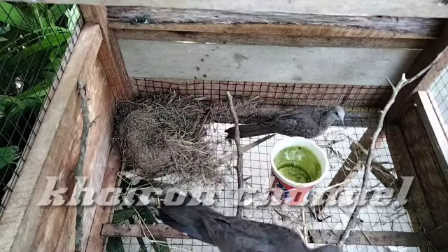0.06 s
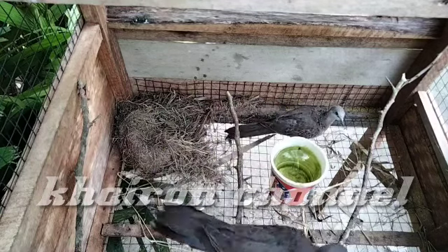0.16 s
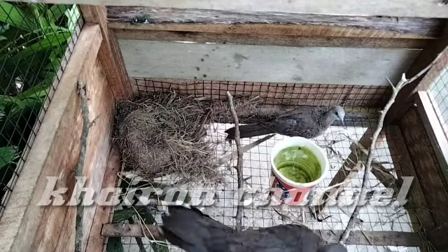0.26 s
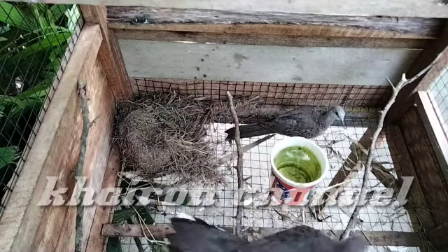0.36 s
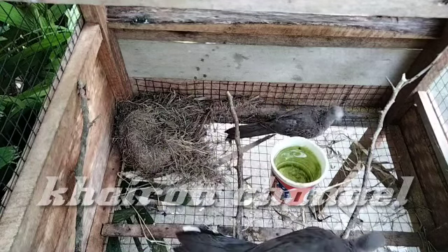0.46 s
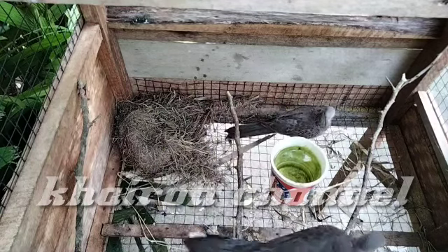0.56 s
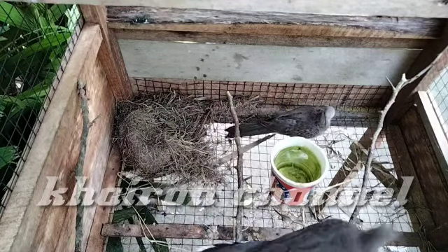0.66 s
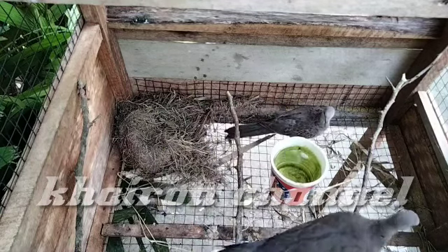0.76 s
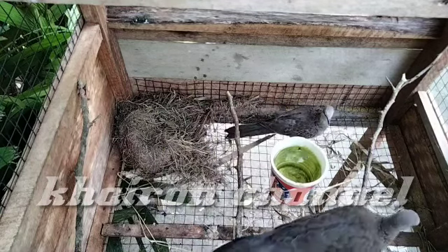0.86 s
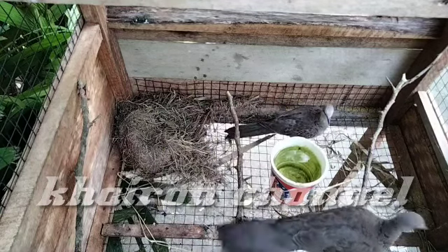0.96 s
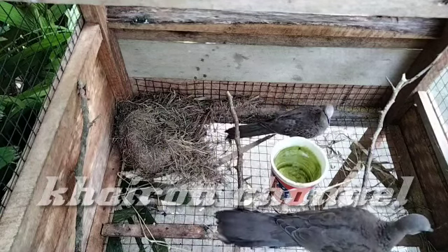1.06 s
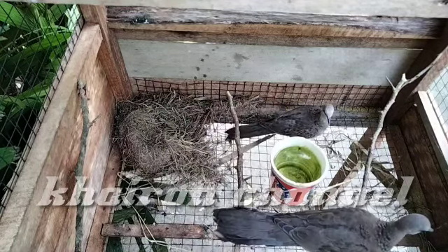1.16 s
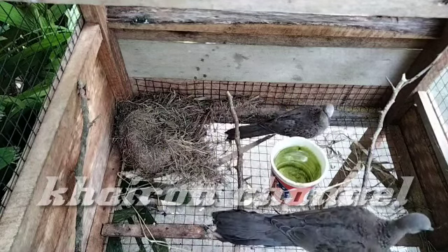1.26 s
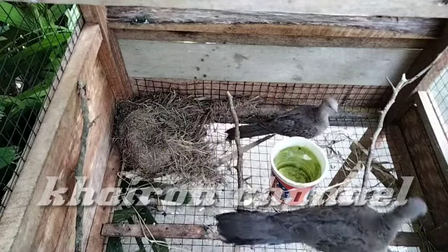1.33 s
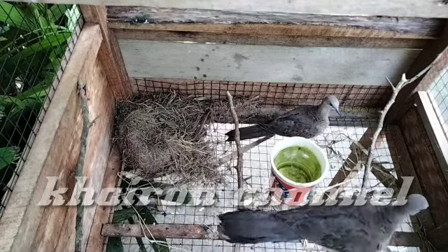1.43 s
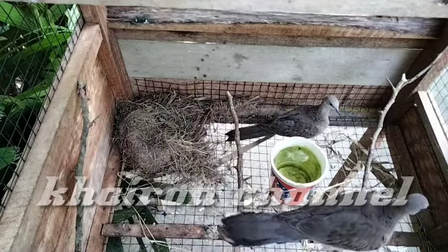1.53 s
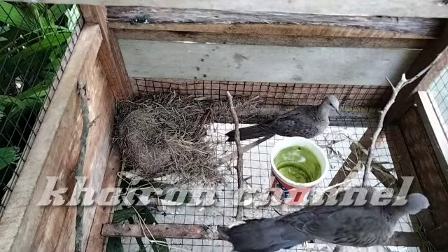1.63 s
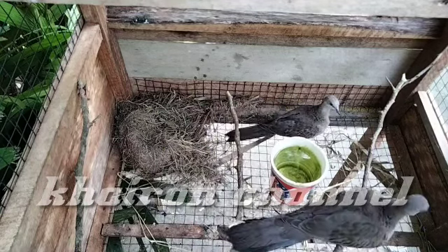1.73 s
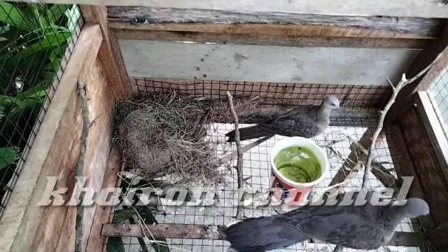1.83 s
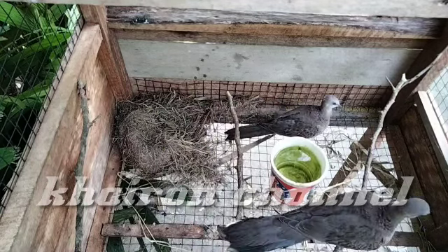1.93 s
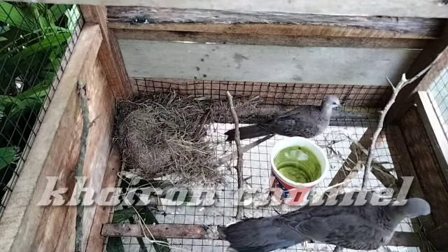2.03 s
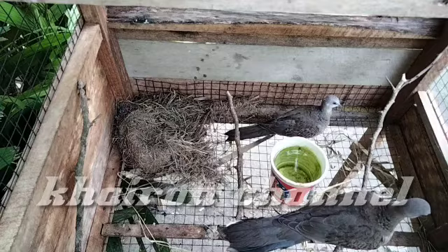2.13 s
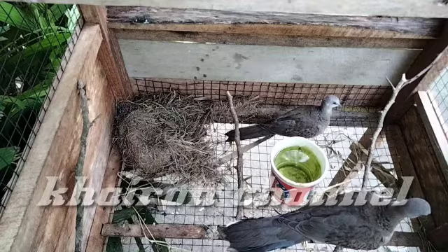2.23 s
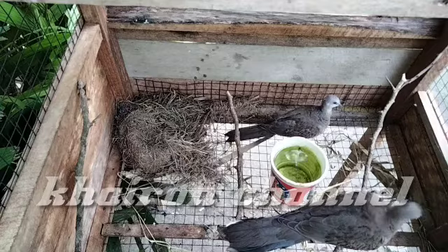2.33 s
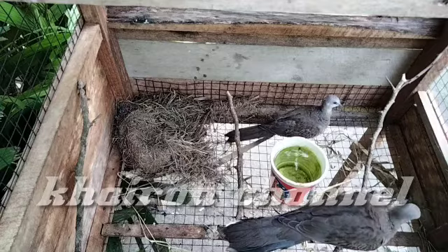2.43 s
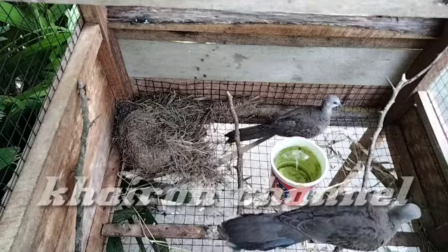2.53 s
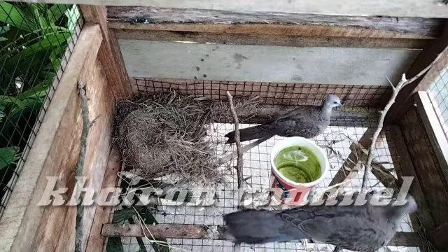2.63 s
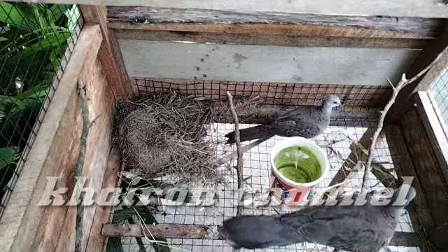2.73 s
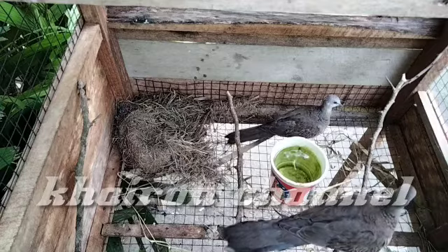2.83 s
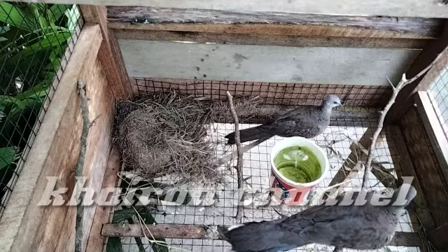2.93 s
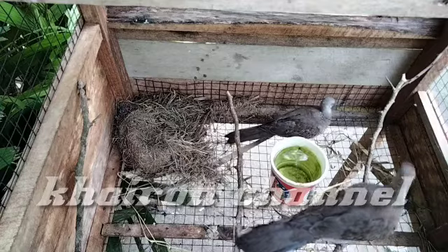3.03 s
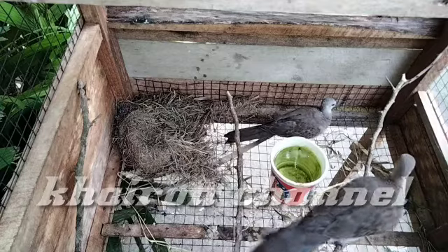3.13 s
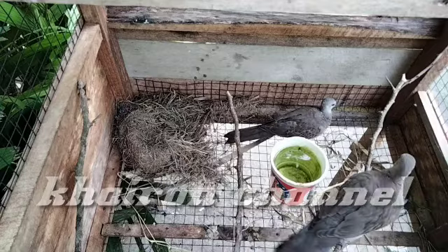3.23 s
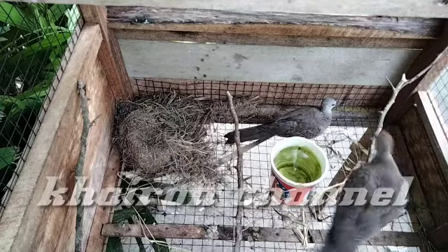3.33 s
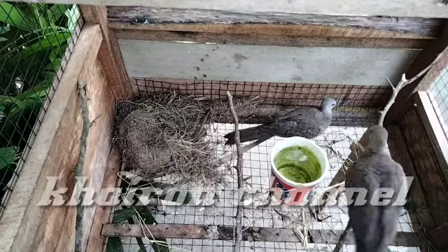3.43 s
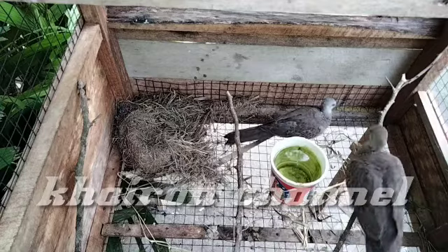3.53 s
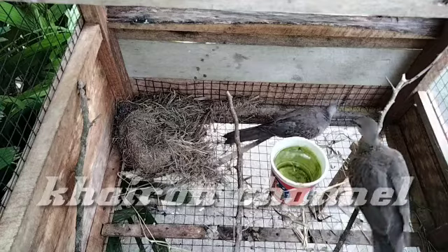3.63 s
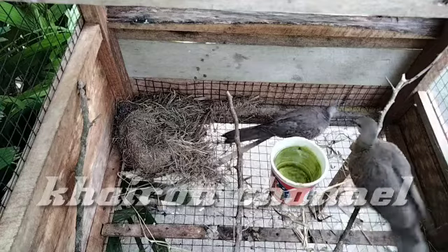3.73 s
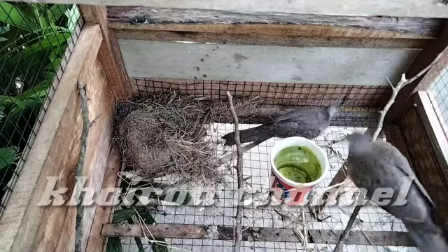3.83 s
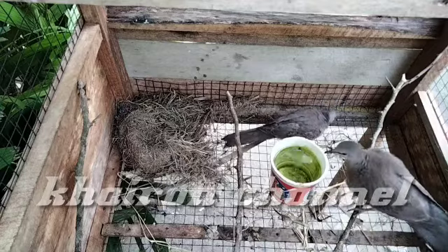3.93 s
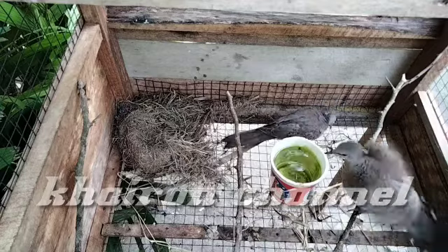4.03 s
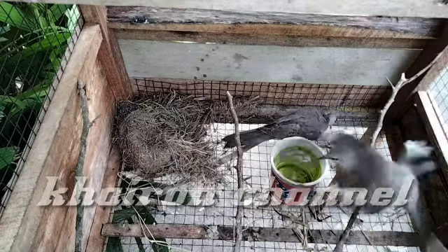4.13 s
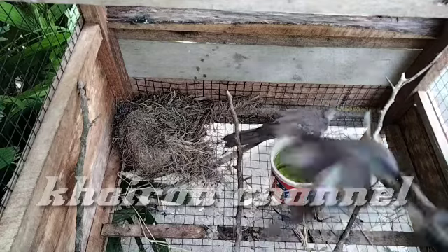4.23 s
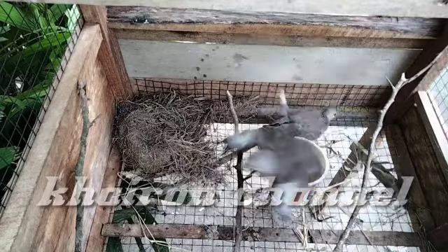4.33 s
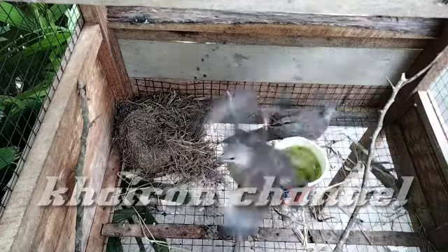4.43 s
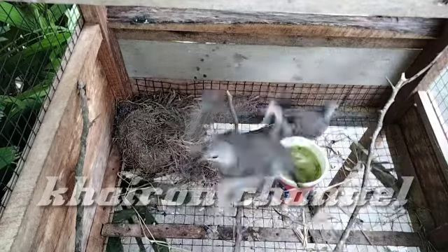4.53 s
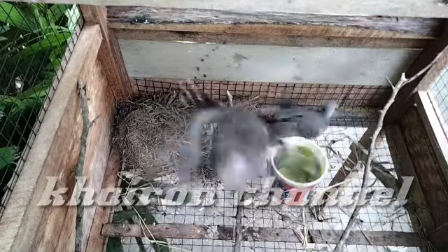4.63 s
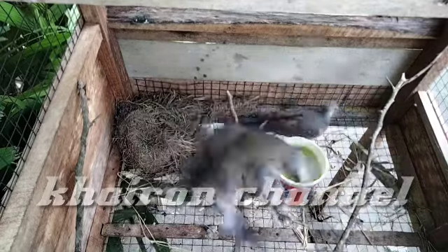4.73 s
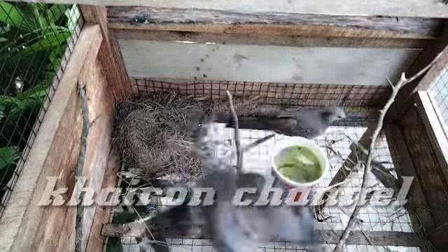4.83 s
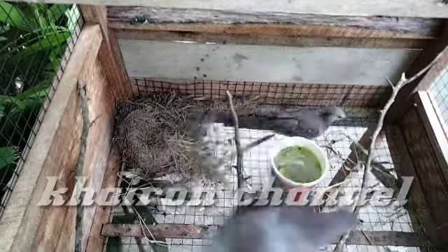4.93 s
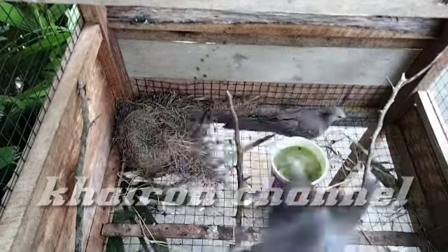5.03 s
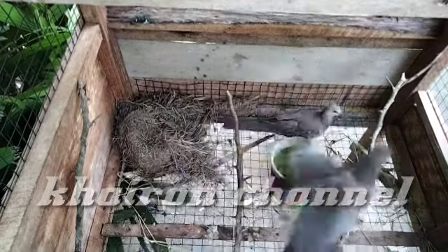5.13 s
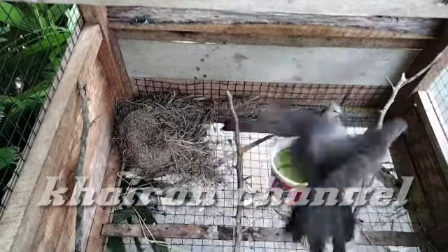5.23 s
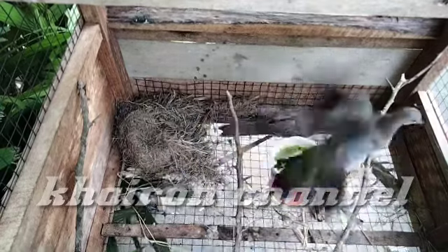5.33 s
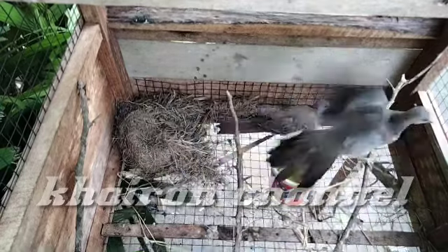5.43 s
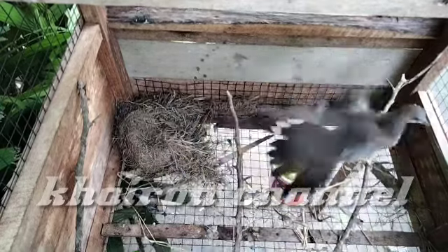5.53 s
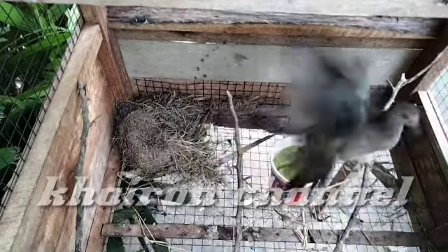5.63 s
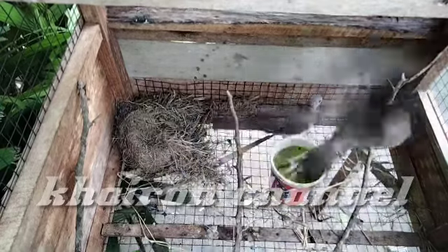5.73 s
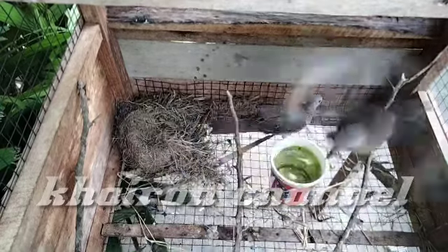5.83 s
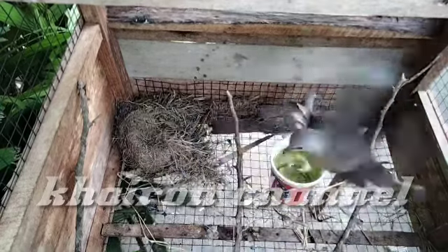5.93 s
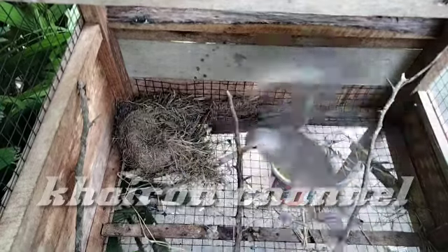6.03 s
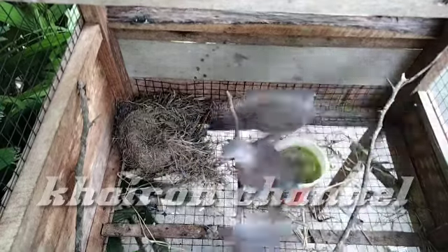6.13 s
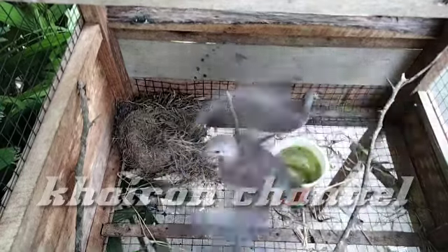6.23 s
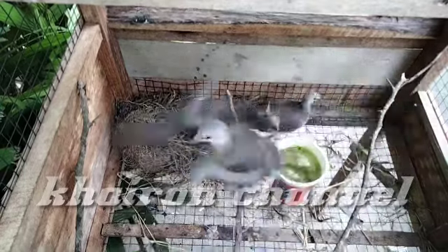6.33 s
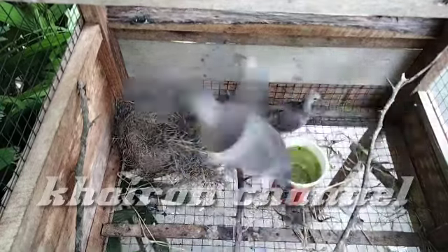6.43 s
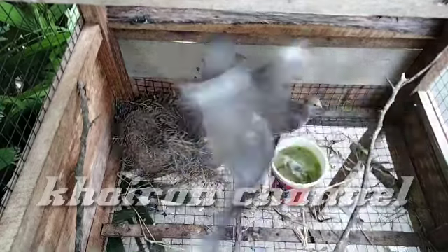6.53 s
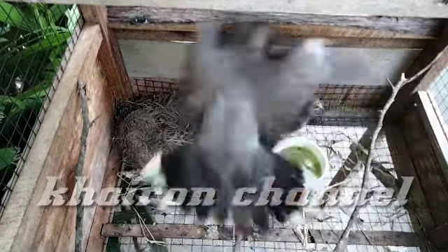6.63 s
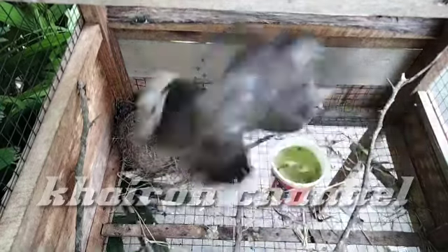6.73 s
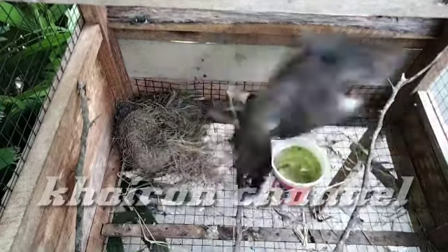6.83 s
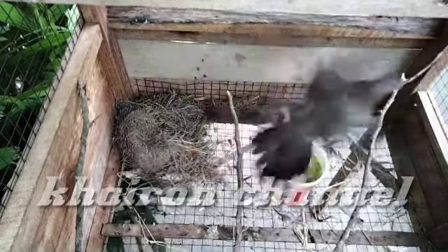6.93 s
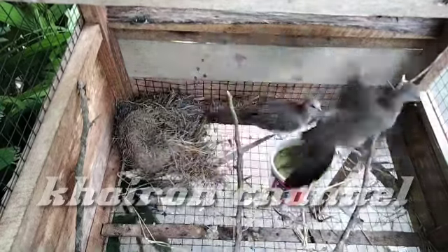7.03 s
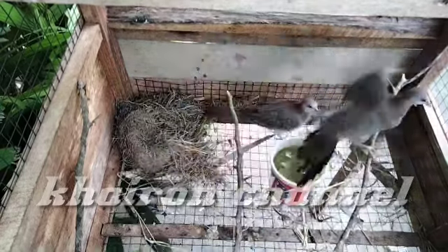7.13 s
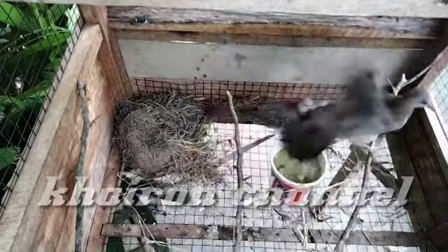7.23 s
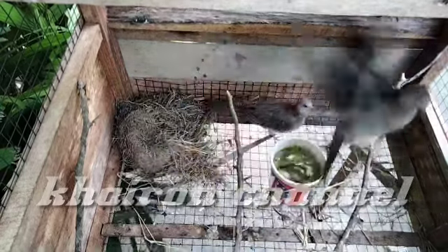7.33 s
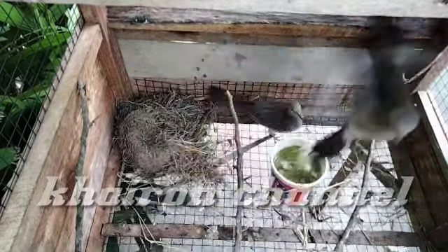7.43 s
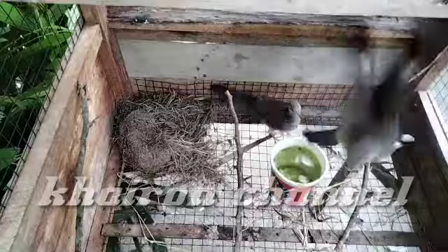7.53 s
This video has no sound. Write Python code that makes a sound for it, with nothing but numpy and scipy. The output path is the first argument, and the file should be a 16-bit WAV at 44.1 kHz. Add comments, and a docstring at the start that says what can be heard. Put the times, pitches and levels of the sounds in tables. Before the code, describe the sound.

For the first four seconds the scene is quiet: a soft distant outdoor wash, a faint thin hum near 1.6 kHz with its lower octave, and small birds twittering in short falling chirps blurred by the yard's echo. Close by, a dove shuffles, its claws making tiny bright ticks on wire, clearest around 0.6, 1.0 and 1.5 s, with dull soft wooden bumps. Sharper high flicks of birdsong come from 1.8 to 2.8 s, a falling whistle at 3.5 and a rising one at 3.8. At about 4.2 s wings burst into rapid flapping, roughly eleven beats per second, with papery slaps, feather swish, low air thumps and cage knocks. It eases briefly near 5.4 s, resumes, becomes hardest and crackliest around 6.4 to 6.9 s, thins near 7.1, then snaps sharply again from 7.2 until the cut at 7.5 s.

```python
"""In an echoing yard, a dove shuffles in a wooden cage with a wire floor, then flies up and beats its wings close by.
Behind it lie a filtered-noise wash, a faint two-tone hum and small birds made of gliding sines with an echo.
Claws tick as noise bursts on the wire; bumps ring the modes of the wood.
Wing slaps are volleys of shaped noise and clicks, feathers swish as noise that follows the stirred air,
and the downwash buffets the microphone with swings of pressure and low turbulence."""
import sys
import numpy as np
from scipy import signal
from scipy.fft import rfft, irfft
from scipy.io import wavfile
from scipy.ndimage import uniform_filter1d

SR = 44100
rng = np.random.default_rng(int(sys.argv[2]) if len(sys.argv) > 2 else 0)


def transcribe(signal):
    """Save signal, clipped to [-1, 1], as a 16-bit WAV file at the path in sys.argv[1]."""
    frames = np.atleast_2d(signal).T
    limited = np.clip(frames, -1, 1)
    pcm = np.round(limited * 32767).astype(np.int16)
    wavfile.write(sys.argv[1], SR, pcm)


N = 333396

# Decay of the yard's echo: freq_hz, t60_s
YARD_ECHO = [(2500, 0.69), (5000, 0.21), (9000, 0.85)]
# Colour of the distant wash: freq_hz, relative level_db (per Hz)
AIR_SPECTRUM = [(8.8, -24), (15, 8), (148, -1), (354, -14.5), (671, -14.5), (799, -13.5), (923, -17),
                (1430, -23.5), (1600, -17.5), (1960, -24.5), (4300, -26.5), (6830, -30.5), (9140, -18),
                (13300, -35), (15400, -26)]
AIR_DB = -53
# Loudness of a far machine's hum: start_s, level_db
HUM_LEVEL = [(0, -85), (.3, -71), (2.4, -70.5), (2.7, -67), (3.4, -71.5), (4.2, -65), (7.56, -67)]
HUM_HZ = 1602

# Twitter of far birds, with the octave of a nearer glide at 3.57 s and a brief buzz or ruffle near 3.7 s;
# each row climbs to its top, then falls:
# start_s, length_s, top_hz, climb_hz, last_hz, level_db (mid-fall, before the mix)
TWITTER_NOTES = [(0, 0.14, 4300, 0, 2820, -65), (0.065, .12, 5480, 508, 3770, -59.5),
                 (0.106, 0.1, 4000, -3, 3200, -68), (0.373, 0.12, 5670, 1470, 4100, -60),
                 (0.393, 0.051, 7800, 5, 6030, -65), (0.468, 0.067, 3730, -8, 2300, -68),
                 (0.667, 0.066, 4800, -1, 2980, -59), (0.672, 0.12, 5700, 897, 5310, -66.5),
                 (0.818, .05, 5130, 600, 4570, -61.5), (0.804, 0.08, 4200, -2, 3930, -69),
                 (.94, 0.13, 5430, 933, 3830, -64.5), (1.003, 0.042, 3570, 0, 2660, -71),
                 (1.069, 0.024, 5400, 0, 4800, -63), (1.075, 0.063, 6870, 305, 6600, -62.5),
                 (1.127, .05, 6360, 10, 4770, -67), (1.196, .09, 5000, 0, 4650, -66),
                 (1.134, 0.052, 4000, -5, 3270, -68), (1.138, .08, 5300, 100, 4980, -68),
                 (1.248, 0.03, 4210, 0, 3200, -64), (1.358, 0.07, 4040, -3, 2690, -71),
                 (1.42, .12, 5140, 0, 4300, -86), (1.544, 0.1, 4500, 0, 3600, -72),
                 (1.807, .05, 5300, 800, 5030, -64), (1.921, 0.055, 5300, 876, 4230, -60),
                 (2.021, 0.035, 5300, 804, 4240, -59.5), (1.651, 0.033, 4200, 502, 4100, -72),
                 (2.116, .06, 3900, 0, 3230, -73), (2.165, 0.029, 4350, 0, 4080, -66),
                 (2.189, 0.041, 3400, 0, 2590, -70), (2.215, .04, 4100, 0, 3920, -71),
                 (2.29, 0.058, 4000, 0, 3400, -66), (2.361, .06, 3900, -2, 2600, -67),
                 (2.383, 0.055, 4600, -2, 3730, -63.5), (2.51, .025, 5400, 0, 4600, -71),
                 (2.73, 0.11, 5950, 746, 5620, -64), (2.933, 0.08, 5300, -3, 3070, -59.5),
                 (3.089, 0.026, 3950, 0, 3700, -72), (3.579, 0.088, 4300, 0, 2610, -59.5),
                 (3.574, 0.039, 10400, -2, 8140, -62), (3.688, 0.02, 9220, 300, 7000, -56),
                 (3.703, .03, 7900, 1500, 6140, -53), (3.71, 0.058, 5120, 524, 4750, -53),
                 (3.77, .04, 6700, 573, 6500, -63)]
CLIMB_HZ_PER_S, SWELL_DB = 28000, 2  # a note swells from SWELL_DB below its level to as much above
BEND = 0.44  # share of the fall that a note has made halfway down
WOBBLE = 0.0122  # unsteadiness of these notes, rms fraction of the pitch
# Short falling strokes of neighbours join each note: level_db against it, length_s, fall as a fraction of pitch
CHATTER_DB, CHATTER_S, CHATTER_FALL = -11, .035, 0.149
# A nearer bird flicks up, drops and settles:
# start_s, top_hz, bottom_hz, top_level_db, bottom_level_db (levels before the shape and mix)
FLICK_CALLS = [(1.81, 9000, 7310, -49, -45.5), (2.084, 8280, 6880, -45, -47),
               (2.325, 8370, 6520, -43.5, -50), (2.541, 8310, 5980, -43, -55),
               (2.753, 7680, 5650, -50, -59)]
# Shape of one flick: time_s, place from bottom 0 to top 1, level_db (added to that of the nearer end)
FLICK_SHAPE = [(0, 0.67, 9), (.015, 0.89, -0.5), (.024, 0.9, 4.5), (.045, 0, -3), (0.083, .15, 0),
               (.14, .17, -18), (.25, 0.49, -24)]
# Long glides of the nearer bird, one sub-table a note: time_s, pitch_hz, level_db (before the mix)
GLIDE_NOTES = [
    [(3.27, 6000, -74), (3.31, 6350, -72), (3.345, 6200, -72), (3.365, 5500, -72), (3.38, 4500, -68)],
    [(3.46, 6300, -64), (3.48, 6610, -68), (3.53, 6440, -48), (3.56, 4930, -52), (3.63, 4050, -57),
     (3.69, 3600, -52), (3.715, 3200, -64)],
    [(3.78, 3260, -69), (3.81, 3960, -48), (3.88, 4540, -40.5), (3.95, 5140, -44.5), (3.985, 5510, -49.5),
     (4.0, 5500, -60)],
]

# Claws on the wire: start_s, level_db (before the burst trim and mix)
CLAW_TICKS = [(0.2295, -47), (0.5611, -44), (0.625, -40.5), (0.7372, -45), (1.0006, -40.5), (1.0395, -45),
              (1.1005, -40), (1.5239, -36), (1.6731, -41), (1.704, -46), (2.7746, -40), (3.9484, -37.5),
              (3.9913, -39.5)]
# Bumps against the cage: start_s, level_db (before a 13 dB trim), pitch_hz (rung most)
CAGE_KNOCKS = [(.071, -39, 955), (.211, -41.5, 724), (0.261, -52, 700), (.309, -51, 751),
               (0.546, -44.5, 1140), (0.662, -43, 910), (.769, -50.5, 791), (1.169, -43.5, 660),
               (1.772, -42, 644), (2.78, -47.5, 1590), (3.652, -45, 732), (4.414, -23, 816),
               (4.639, -22, 400), (4.659, -19.5, 430), (4.699, -22.5, 840), (4.822, -20, 490),
               (4.958, -24, 956), (5.115, -28, 453), (5.207, -34, 400), (5.382, -32.5, 756),
               (5.646, -30, 1730), (5.707, -19.5, 403), (5.77, -22, 536), (5.791, -24, 1150),
               (5.859, -25, 400), (5.941, -24, 409), (6.049, -26, 990), (6.21, -28.5, 536),
               (6.282, -25, 425), (6.377, -14.5, 434), (6.418, -16, 1030), (6.434, -30, 1840),
               (6.499, -21.5, 1020), (6.516, -23, 441), (6.59, -25, 425), (6.686, -22, 396),
               (6.795, -32, 1140), (6.826, -25, 423), (6.85, -27, 727), (7.03, -34.5, 420),
               (7.255, -29, 653), (7.318, -22.5, 390), (7.333, -16.5, 1580), (7.407, -19.5, 400),
               (7.466, -32, 444)]
# Modes of the wooden cage: freq_hz (before a random detune), relative level_db, t60_s
WOOD_MODES = [(323, -3.5, 0.025), (418, -1, 0.026), (580, -18, 0.034), (706, -5, 0.0088), (834, 2.5, 0.014),
              (1022, -5, 0.039), (1163, -10, 0.035), (1340, -2, 0.024), (1730, -3, 0.022),
              (2010, -7, 0.036), (2420, -16, 0.015)]
HARD_T60, SOFT_T60 = 0.056, 0.23  # decay of the blow itself, s
# Brief low whoops, as of flight feathers: start_s, length_s, first_hz, last_hz, level_db (before a factor of 2)
FEATHER_WHOOPS = [(0.062, 0.041, 365, 885, -53), (0.543, 0.015, 412, 810, -52.5),
                  (.672, 0.029, 1010, 820, -58), (3.957, 0.068, 1320, 1450, -58),
                  (4.624, 0.018, 900, 1160, -35), (4.711, .014, 950, 1170, -38),
                  (5.042, 0.014, 950, 1010, -40), (5.139, .015, 800, 785, -39.5),
                  (5.232, 0.017, 746, 885, -46), (5.27, 0.02, 940, 1000, -49),
                  (5.73, 0.011, 1110, 1430, -36), (5.788, .012, 1060, 1140, -39),
                  (5.84, 0.011, 1060, 1190, -29.5), (6.41, 0.019, 1036, 960, -28.5),
                  (6.532, 0.024, 1020, 820, -39), (7.405, .015, 1150, 1160, -38),
                  (7.495, .015, 885, 860, -42)]

# Wing beats, timed at the end of the downstroke:
# time_s, pressure_db (before it), suction_db (after the upstroke)
WING_BEATS = [(4.237, -26.5, -29), (4.345, -29, -25), (4.452, -33, -22.5), (4.555, -39, -25.5),
              (4.649, -18.5, -16), (4.731, -14, -34), (4.848, -25, -20.5), (4.942, -13, -16),
              (5.031, -14.5, -15), (5.12, -11.5, -15.5), (5.207, -15, -18), (5.295, -19.5, -17.5),
              (5.394, -45, -23), (5.602, -27.5, -24), (5.689, -23, -20), (5.777, -16, -14),
              (5.866, -17, -24), (5.972, -18.5, -24), (6.071, -16, -15), (6.17, -23.5, -16.5),
              (6.266, -20.5, -16), (6.358, -18.5, -10.5), (6.434, -8.5, -14.5), (6.523, -15.5, -16.5),
              (6.618, -23, -18), (6.714, -22, -28), (6.751, -37, -16.5), (6.835, -17.5, -18.5),
              (6.924, -23, -20.5), (7.014, -21.5, -24), (7.158, -29, -31), (7.254, -26, -23.5),
              (7.347, -25, -26), (7.392, -22, -17), (7.475, -16, -25)]
UPSTROKE_S = 0.0436  # end of downstroke to end of upstroke
# Each big swing of pressure has a small opposite one across the turn, this much weaker:
REBOUND_DB, LEAD_DB = -9.5, -19  # after the downstroke, before the end of the upstroke
# Breeze on the microphone: time_s, level_db
BREEZE_LEVEL = [(0, -68), (1.35, -57), (1.52, -52), (1.7, -58), (2.1, -50), (2.7, -52.5), (3.2, -55),
                (3.55, -72), (3.8, -48.5), (4.2, -50.5)]
# Colour of the turbulence: freq_hz, relative level_db (per Hz)
BUFFET_SPECTRUM = [(4.7, -33), (8.0, 1.5), (29, -6), (134, -16), (193, -26.5), (300, -37), (390, -25.5),
                   (660, -120)]

# Level of the feather noise on top of what the stirred air gives: time_s, relative level_db
FEATHER_LEVEL = [(4.12, -25), (4.2, -17), (4.36, -14), (4.5, -13.5), (4.7, -13), (5.1, -15.5), (5.4, -10.5),
                 (5.6, -11.5), (5.8, -12.5), (6.1, -16), (6.45, -10.5), (6.6, -10.5), (6.74, -18),
                 (6.87, -11.5), (6.95, -20.5), (7.04, -11), (7.2, -13.5), (7.4, -11), (7.56, -12.5)]
# Feather noise grows as a power of the stirred air, averaged over a stroke
HISS_SLOPE, DULL_SLOPE, DULL_DB, STROKE_S = 0.82, 0.61, -11, 0.057
# Colour of the dull swish: freq_hz, relative level_db (per Hz)
DULL_SPECTRUM = [(150, 1), (350, 2), (650, -4), (1000, -2), (2000, -5.5), (4000, -8.5), (6000, -11.5)]
# Ringing wires of the cage: freq_hz, level_db (of the ring's start, per unit impulse), t60_s
WIRE_MODES = [(1506, -43, 0.23), (1945, -49, 0.15)]

# Wing slaps: start_s, crack_db, body_db, t60_s (levels before the burst trim; the body rings 1.18 times longer)
WING_SLAPS = [(4.1864, -31.5, -55, 0.06), (4.2287, -17.5, -34, 0.038), (4.2921, -26, -43, 0.051),
              (4.336, -20, -48, 0.063), (4.364, -17.5, -27, 0.03), (4.4115, -21.5, -29.5, 0.088),
              (4.5452, -21.5, -29, 0.036), (4.5972, -19, -26, 0.026), (4.6414, -18.5, -25.5, 0.13),
              (4.682, -17.5, -27, 0.057), (4.7057, -23, -40, 0.054), (4.7516, -21.5, -35, 0.025),
              (4.824, -17.5, -28, 0.031), (4.893, -23, -41, 0.032), (4.9405, -17, -50, 0.036),
              (5.025, -12.5, -45, 0.016), (5.1167, -13, -20.5, 0.012), (5.2066, -13, -46, 0.042),
              (5.3847, -12.5, -29, 0.056), (5.5374, -21.5, -51, 0.037), (5.5752, -21.5, -51, 0.03),
              (5.646, -19.5, -24.5, 0.023), (5.712, -25, -28, 0.085), (5.7295, -14.5, -23, 0.041),
              (5.7736, -12.5, -25, 0.04), (5.8177, -17, -24.5, 0.05), (5.8611, -16.5, -25, 0.03),
              (5.9316, -20.5, -31.5, 0.12), (6.0192, -23, -49, 0.045), (6.07, -18.5, -29, 0.066),
              (6.1477, -19, -36, 0.038), (6.211, -23, -42, 0.099), (6.3597, -14.5, -33, 0.07),
              (6.3973, -17.5, -31, 0.066), (6.4368, -12, -19.5, 0.038), (6.48, -19.5, -36, 0.023),
              (6.501, -25, -31, 0.036), (6.5185, -7.5, -19.5, 0.03), (6.567, -19, -37, 0.021),
              (6.6438, -13.5, -36, 0.023), (6.6735, -12, -27, 0.045), (6.6866, -5, -18.5, 0.026),
              (6.7155, -16, -28, 0.029), (6.7508, -9, -21.5, 0.036), (6.7853, -13, -25.5, 0.066),
              (6.8289, -9, -21.5, 0.021), (6.8543, -25, -30, 0.11), (7.0344, -20.5, -50, 0.064),
              (7.1606, -24.5, -53, 0.065), (7.206, -15, -27, 0.04), (7.2557, -22, -43, 0.11),
              (7.2932, -11, -32.5, 0.053), (7.3377, -6, -21, 0.024), (7.3815, -9, -30, 0.022),
              (7.3893, -12.5, -28, 0.027), (7.429, -20, -29, 0.053), (7.4702, -4.5, -23.5, 0.021)]
# Colour of the bright crack, shared by claws and hiss: freq_hz, relative level_db (per Hz)
CRACK_SPECTRUM = [(2350, -17), (4000, -19.5), (5500, -18), (6400, -16), (9000, 1.5), (11100, -9),
                  (13000, -8.5), (14600, -10), (15300, -2)]
# Colour of a slap's duller body: freq_hz, relative level_db (per Hz)
BODY_SPECTRUM = [(900, -31), (1500, 0.5), (3000, -0.5), (5000, -3), (7000, -4.5)]
# Feathers rustle at every turn: crack against the push of air, body against that crack, decay in s
RUSTLE_DB, RUSTLE_BODY_DB, RUSTLE_T60 = -11.5, -14.5, 0.028
# First click of a loud slap: level against the crack; full on short slaps, gone from this t60 in s upwards
CLICK_DB, CLICK_T60 = -2.5, .045
EDGE_HZ = 15480  # top of the microphone's band


def gain_of(db):
    """Decibels to a linear factor."""
    return 10 ** (np.asarray(db) / 20)


def evened(x):
    """Scales x to rms 1."""
    return x / np.sqrt(np.mean(x ** 2) + 1e-20)


def read(points, at):
    """Reads a table of frequencies and values along a log frequency axis."""
    f, value = np.transpose(points)
    return np.interp(np.log(at + 1), np.log(f + 1), value)


def curve(rows, column):
    """One column of a timed table at every sample; -120 before its first row."""
    rows = np.asarray(rows)
    return np.interp(np.arange(N) / SR, rows[:, 0], rows[:, column], left=-120)


def add(mix, s, sound):
    """Lays a sound into the mix at s seconds."""
    part = mix[max(round(s * SR), 0):][:len(sound)]
    part += sound[:len(part)]


def coloured(x, spectrum):
    """Gives x a spectrum, at rms 1."""
    hz = np.fft.rfftfreq(len(x), 1 / SR)
    return evened(irfft(rfft(x) * gain_of(read(spectrum, hz)), len(x)))


def smooth_noise(size):
    """Noise at rms 1, smoothed twice over size samples."""
    noise = rng.standard_normal(N)
    return evened(uniform_filter1d(uniform_filter1d(noise, size), size))


def flicker(size, depth_db):
    """A random gain that changes every size samples or so, by depth_db rms."""
    return gain_of(depth_db * smooth_noise(size))


def patchy(x, depth_db):
    """Lets the colour of x drift in random patches, some hundred Hz wide and tens of ms long."""
    z = signal.stft(x, nperseg=512)[2]
    patches = uniform_filter1d(rng.standard_normal(z.shape), size=4, axis=0)
    patches = uniform_filter1d(patches, size=7, axis=1)
    return evened(signal.istft(z * gain_of(depth_db * evened(patches)), nperseg=512)[1][:N])


def bursts(times, dbs, t60s, snap_db=0, tail_db=-18, tail_t60=0.17):
    """Envelope of blows: a quick death and a weaker ring of the wooden box; hard blows start faster and with a snap."""
    power, t = np.zeros(N), np.arange(SR // 3) / SR
    for s, db, t60 in zip(times, dbs, t60s):
        hard = np.clip((db + 26) / 16, 0, 1)
        snap = hard * gain_of(snap_db - 60 * t / 0.023)
        tail = gain_of(tail_db - 60 * t / tail_t60)
        fall = gain_of(-60 * t / max(t60, .005)) + snap + tail
        rise = 1 - np.exp(-t / (.0015 - .0012 * hard))
        add(power, s, (gain_of(db - 4) * rise * fall) ** 2)
    return np.sqrt(power)


def wash():
    """Distant wash of the neighbourhood: coloured noise with a slow, slight flicker."""
    return gain_of(AIR_DB) * coloured(rng.standard_normal(N), AIR_SPECTRUM) * flicker(size=3000, depth_db=0.73)


def hum():
    """A far machine hums on a tone and the octave below, each with its own flicker."""
    turn = 2 * np.pi * HUM_HZ * np.arange(N) / SR
    upper = np.sin(turn) * flicker(size=1500, depth_db=1.5)
    lower = gain_of(-2.5) * np.sin(turn / 2) * flicker(size=2500, depth_db=3)
    return np.sqrt(2) * gain_of(curve(HUM_LEVEL, 1)) * (upper + lower)


def twitter():
    """Notes climb and fall with a swell, joined by random short strokes of neighbours."""
    notes = []
    chances = rng.random((len(TWITTER_NOTES), 6, 2))  # six neighbours a note
    for (s, length, top_hz, climb_hz, last_hz, db), chance in zip(TWITTER_NOTES, chances):
        end = s + length
        peak = s + min(climb_hz / CLIMB_HZ_PER_S, length / 1.4)
        times = [s, peak, (peak + end) / 2, end]
        pitches = [top_hz - climb_hz, top_hz, top_hz - BEND * (top_hz - last_hz), last_hz]
        notes.append((times, pitches, [db - SWELL_DB, db - SWELL_DB, db, db + SWELL_DB], WOBBLE))
        for late, place in chance:
            at = s + late * (length + .04)
            hz = last_hz + 1.3 * place * (top_hz - last_hz + 500)
            pitches = [hz, hz * (1 - CHATTER_FALL)]
            notes.append(([at, at + CHATTER_S], pitches, [db + CHATTER_DB] * 2, WOBBLE))
    return notes


def nearer_calls():
    """Steady-voiced glides, and flicks that stretch one shape between a top and a bottom pitch."""
    notes = [(*np.transpose(glide), 0) for glide in GLIDE_NOTES]
    t, place, shape_db = np.transpose(FLICK_SHAPE)
    for s, top_hz, low_hz, top_db, low_db in FLICK_CALLS:
        pitches = low_hz + place * (top_hz - low_hz)
        notes.append((s + t, pitches, shape_db + np.where(place > .5, top_db, low_db), 0))
    return notes


def yard_echo(direct):
    """A tail of noise whose decay depends on frequency, at unit energy, spreads the sound."""
    hz, t, z = signal.stft(rng.standard_normal(SR), SR, nperseg=256)
    decay = gain_of(-60 * t / read(YARD_ECHO, hz)[:, None])
    tail = signal.istft(z * decay, SR, nperseg=256)[1]
    return signal.fftconvolve(direct, tail / np.linalg.norm(tail))[:N]


def songbirds():
    """Gliding whistles with a burr and a weak octave on low notes, heard mostly through the echo of the yard."""
    direct, unsteady = np.zeros(N), smooth_noise(150)
    for s, hz, db, wobble in nearer_calls() + twitter():
        t = np.arange(s[0], s[-1], 1 / SR)
        pitch = np.interp(t, s, hz) * (1 + wobble * unsteady[round(s[0] * SR):][:len(t)])
        turn = 2 * np.pi * np.cumsum(pitch) / SR
        octave = gain_of(-17.5 - 80 * np.maximum(pitch / 4800 - 1, 0))
        voice = np.sin(turn) + octave * np.sin(2 * turn)
        level = np.sqrt(2) * gain_of(np.interp(t, s, db))
        add(direct, s[0], level * voice * signal.windows.tukey(len(t), .15))
    direct *= flicker(size=120, depth_db=3.0) * flicker(size=25, depth_db=2)  # the burr
    return gain_of(-4.0) * direct + gain_of(0.5) * yard_echo(direct)


def steps():
    """Claws tick on the wire floor: bright noise in short bursts."""
    s, db = np.transpose(CLAW_TICKS)
    ticks = bursts(s - .001, db, np.full(len(s), .035))
    return gain_of(1.5) * ticks * coloured(rng.standard_normal(N), CRACK_SPECTRUM)


def knocks():
    """A scuffing blow rings the modes of the cage, most near the pitch of the spot it hits."""
    out, t = np.zeros(N), np.arange(SR // 4) / SR
    hz, mode_db, ring = np.transpose(WOOD_MODES)[:, :, None]
    for s, db, centre_hz in CAGE_KNOCKS:
        # light bumps land softly and favour their own pitch more; rise in s, focus in dB per octave squared
        t60, rise, focus = (HARD_T60, .002, -7) if db > -35 else (SOFT_T60, .008, -16)
        blow = rng.standard_normal(len(t)) * gain_of(-60 * t / t60) * (1 - np.exp(-t / rise))
        near_db = np.maximum(focus * np.log2(hz / centre_hz) ** 2, -28)
        detune = rng.uniform(0.908, 1.104, hz.shape)
        modes = gain_of(mode_db + near_db - 60 * t / ring) * np.sin(2 * np.pi * hz * detune * t)
        sound = signal.fftconvolve(blow, modes.sum(0))[:len(t)]
        add(out, s, gain_of(db - 13) * sound / np.sqrt(np.mean(sound[:900] ** 2)))
    return out


def whoops():
    """Feathers sing for a moment: short gliding sines that swell and fade."""
    out = np.zeros(N)
    for s, length, first_hz, last_hz, db in FEATHER_WHOOPS:
        hz = np.linspace(first_hz, last_hz, round(length * SR))
        tone = np.sin(2 * np.pi * np.cumsum(hz) / SR)
        add(out, s, 2 * gain_of(db) * tone * np.hanning(len(hz)))
    return out * flicker(size=200, depth_db=2.5)


def turns():
    """Both turns of every wing beat: time, pressure before and suction after."""
    s, pressure_db, suction_db = np.transpose(WING_BEATS)
    before_db = np.r_[pressure_db, suction_db + LEAD_DB]
    after_db = np.r_[pressure_db + REBOUND_DB, suction_db]
    return np.r_[s, s + UPSTROKE_S], before_db, after_db


def pushes():
    """Pressure builds before each turn of the wing, drops fast to suction and recovers."""
    pressure, u = np.zeros(N), np.arange(-.06, .06, 1 / SR)
    swing, build = .005, .011  # s from the turn to the extreme, s of the slow side
    width = np.where(u < -swing, build, 0.63 * swing)
    hump = np.exp(-.5 * ((u + swing) / width) ** 2)
    for s, pressure_db, suction_db in zip(*turns()):
        add(pressure, s + u[0], gain_of(pressure_db) * hump - gain_of(suction_db) * hump[::-1])
    return pressure


def downwash():
    """The pushes of air, with turbulence that follows their strength and the breeze."""
    pressure = pushes()
    stirring = gain_of(-5) * uniform_filter1d(abs(pressure), 2500) + gain_of(curve(BREEZE_LEVEL, 1))
    turbulence = coloured(rng.standard_normal(N), BUFFET_SPECTRUM) * flicker(size=1200, depth_db=2.0)
    return pressure + stirring * turbulence


def wires(shaking):
    """Wires of the cage ring on as decaying sines under the shaking."""
    t = np.arange(SR // 4) / SR
    fade = signal.windows.tukey(len(t), .02)
    ring = sum(gain_of(db - 60 * t / t60) * np.sin(2 * np.pi * hz * t) * fade for hz, db, t60 in WIRE_MODES)
    return signal.oaconvolve(shaking, ring)[:N]


def swish():
    """Feather noise flutters in puffs of a few milliseconds and keeps the wires of the cage ringing."""
    size = round(STROKE_S * SR)
    stirred = uniform_filter1d(uniform_filter1d(abs(pushes()), size), size) + gain_of(-39.5)
    level = gain_of(curve(FEATHER_LEVEL, 1))
    bright = level * stirred ** HISS_SLOPE
    low = level * gain_of(DULL_DB) * stirred ** DULL_SLOPE
    puffs = flicker(size=450, depth_db=3)
    hiss = bright * coloured(rng.standard_normal(N), CRACK_SPECTRUM)
    dull_noise = patchy(coloured(rng.standard_normal(N), DULL_SPECTRUM), depth_db=2.0)
    dull = low * dull_noise * flicker(size=500, depth_db=1.5)
    shaking = low * rng.standard_normal(N) * flicker(size=1500, depth_db=3.5)
    return puffs * (hiss + dull) + wires(shaking)


def click(x):
    """Turns impulses into ticks with a short bright ring near 9 kHz, as of the microphone."""
    t = np.arange(200) / SR
    high = np.sin(2 * np.pi * 9000 * t) * gain_of(-60 * t / 0.0022)
    low = .5 * np.sin(2 * np.pi * 4000 * t) * gain_of(-60 * t / 0.0011)
    return signal.oaconvolve(x, high + low)[:N]


def slaps():
    """Each slap is a ragged volley of feather tips: a bright crack over a duller body; each wing turn adds a soft one."""
    at, pressure_db, suction_db = turns()
    soft_db = np.maximum(pressure_db, suction_db) + RUSTLE_DB
    rustles = np.c_[at, soft_db, soft_db + RUSTLE_BODY_DB, np.full(len(at), RUSTLE_T60)]
    s, crack_db, body_db, t60 = np.r_[WING_SLAPS, rustles].T
    volley = flicker(size=30, depth_db=2.5)
    crack = bursts(s, crack_db, t60, snap_db=-3) * coloured(rng.standard_normal(N), CRACK_SPECTRUM)
    body_noise = patchy(coloured(rng.standard_normal(N), BODY_SPECTRUM), depth_db=0.5)
    body = bursts(s, body_db, 1.18 * t60, snap_db=10.5) * body_noise
    crisp = np.clip(3 * (1 - t60 / CLICK_T60), 0, 1) * (crack_db > -17)
    first = np.zeros(N)
    first[np.round(s * SR).astype(int) + 8] = gain_of(CLICK_DB + crack_db) * crisp
    return volley * (crack + body) + click(first)


def scene():
    """Sums all layers, from the distant yard to the wings."""
    background = wash() + hum() + songbirds()
    cage = steps() + knocks()
    wings = whoops() + downwash() + swish() + slaps()
    return (background + cage + wings)[None]


def record(dry):
    """The microphone passes no steady pressure, rounds off the hardest cracks and cuts the extreme treble."""
    wet = signal.lfilter(*signal.butter(1, 4, "high", fs=SR), dry)
    rounded = wet / (1 + (wet / .85) ** 4) ** .25
    band = signal.firwin(511, EDGE_HZ, window=("kaiser", 6), fs=SR)
    return signal.oaconvolve(rounded, band[None], "same")


dry = scene()
out = record(dry)
transcribe(out)
```